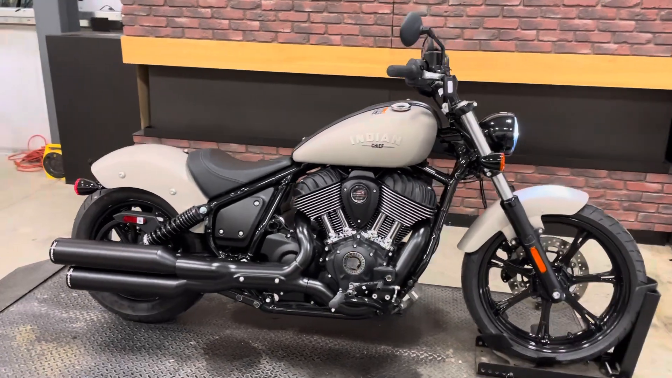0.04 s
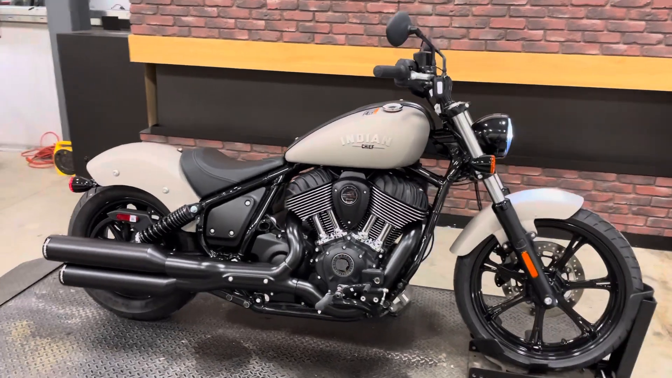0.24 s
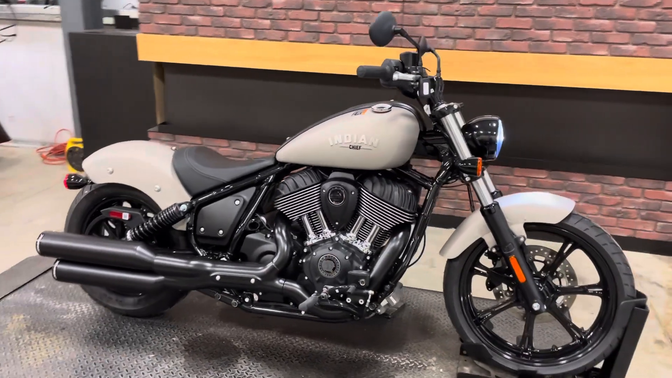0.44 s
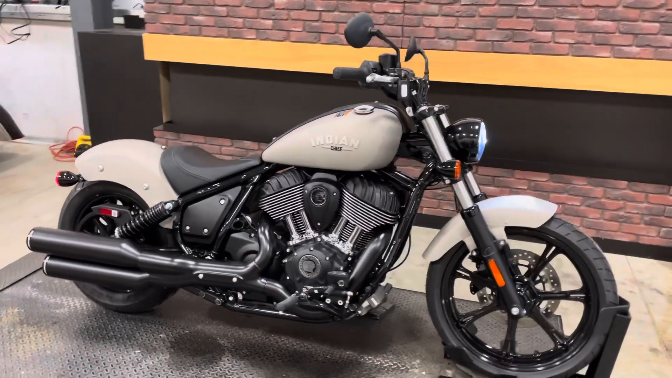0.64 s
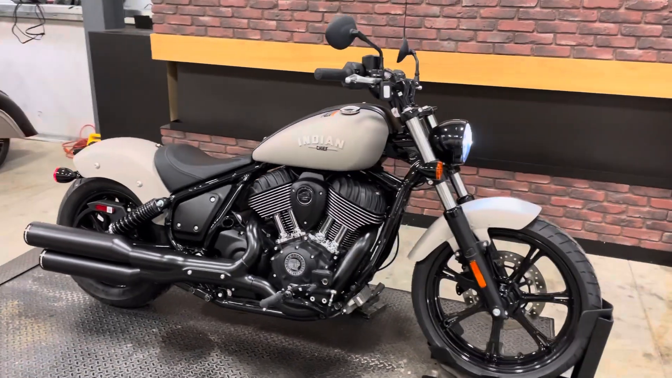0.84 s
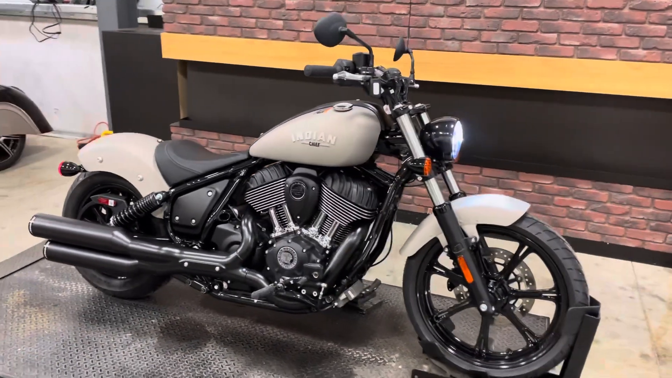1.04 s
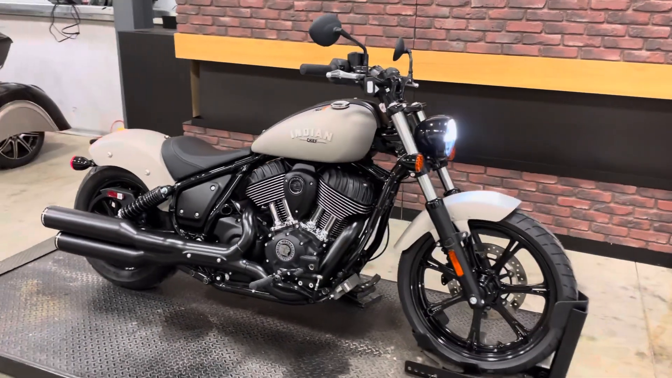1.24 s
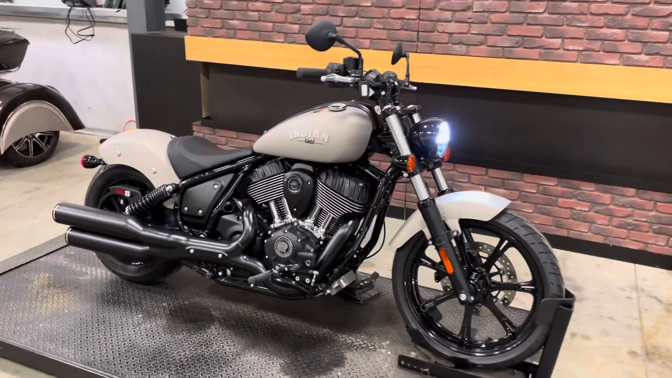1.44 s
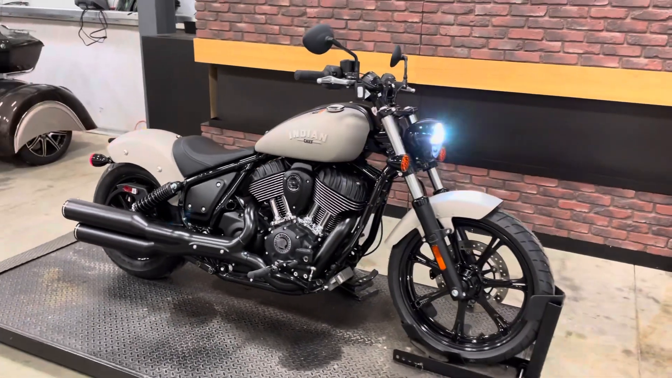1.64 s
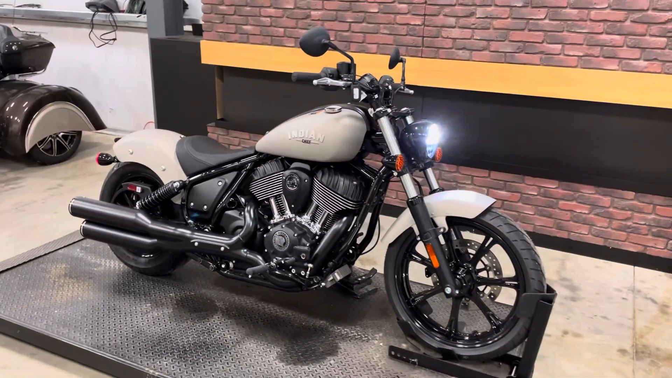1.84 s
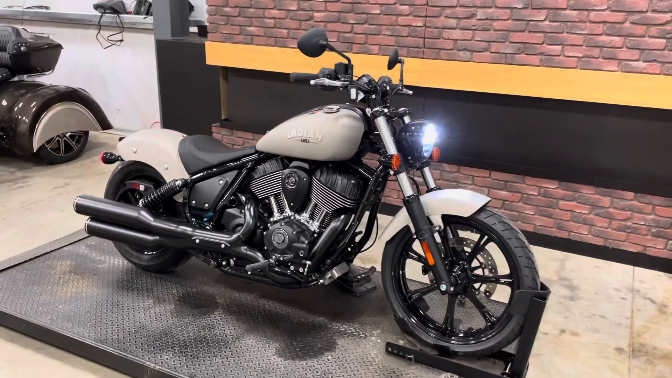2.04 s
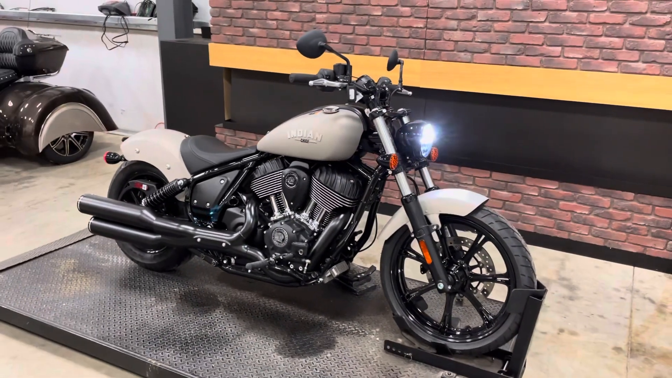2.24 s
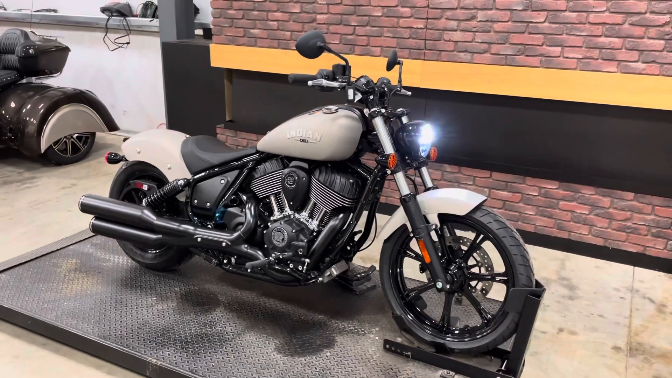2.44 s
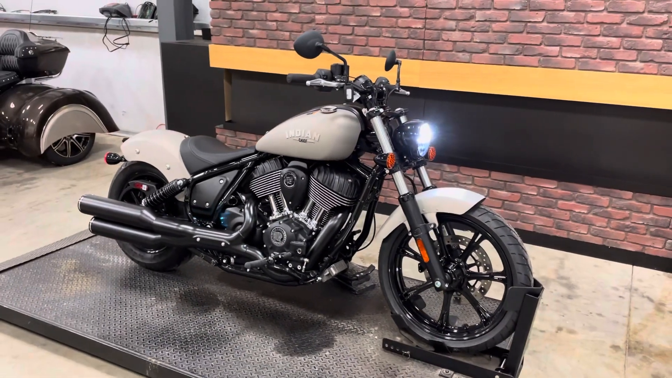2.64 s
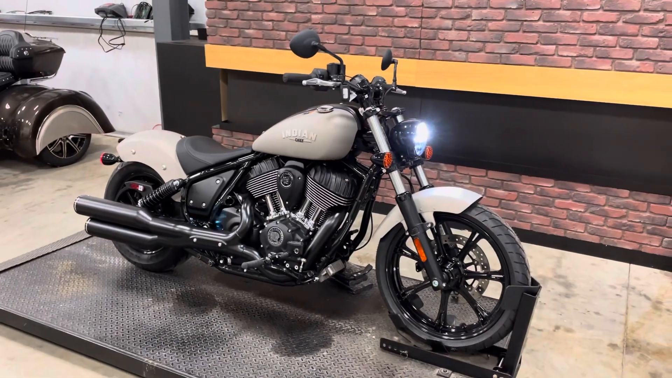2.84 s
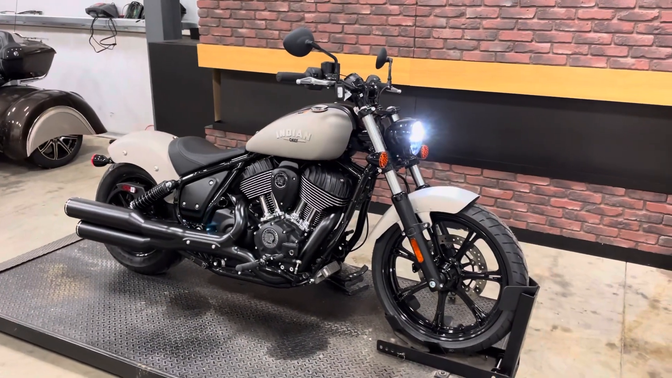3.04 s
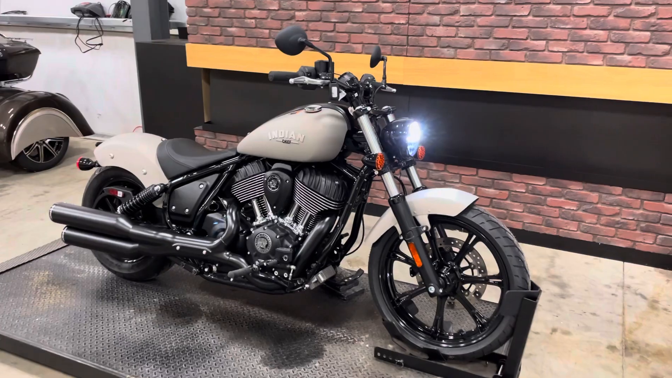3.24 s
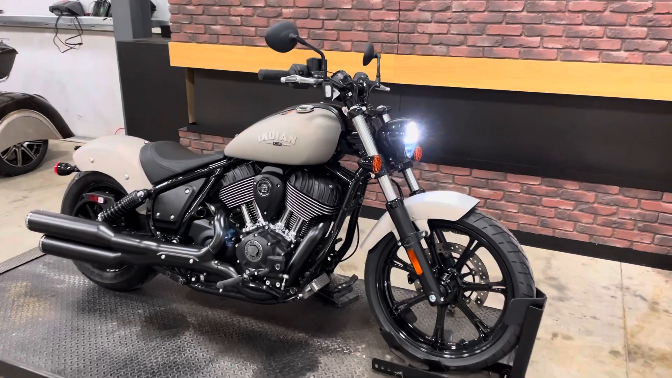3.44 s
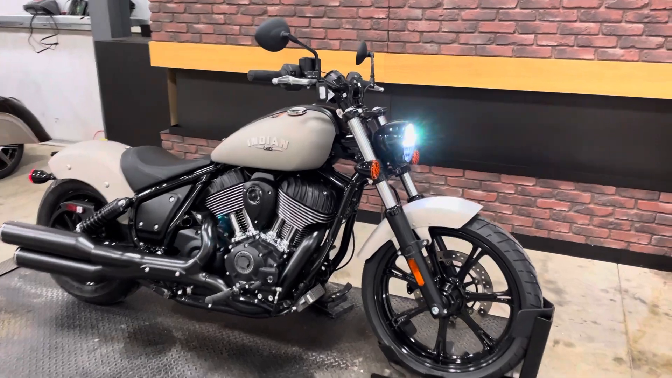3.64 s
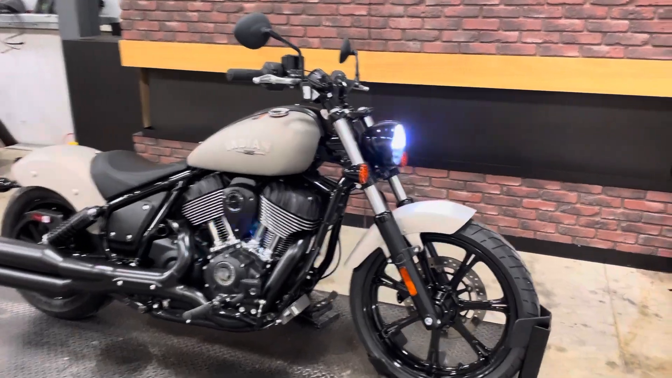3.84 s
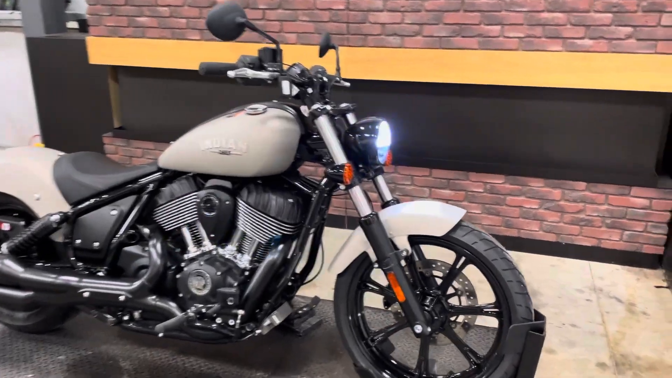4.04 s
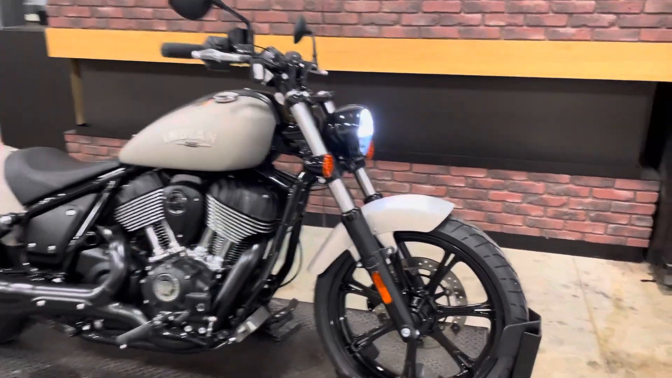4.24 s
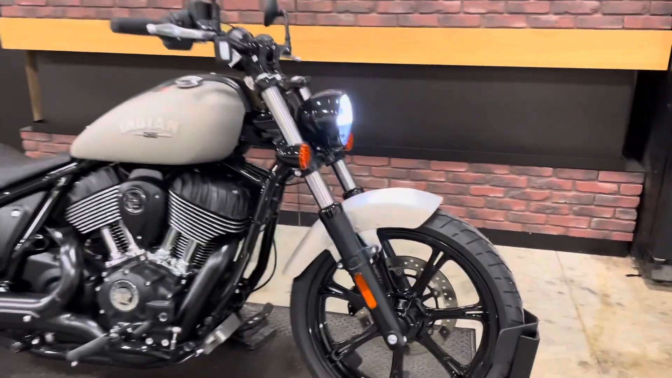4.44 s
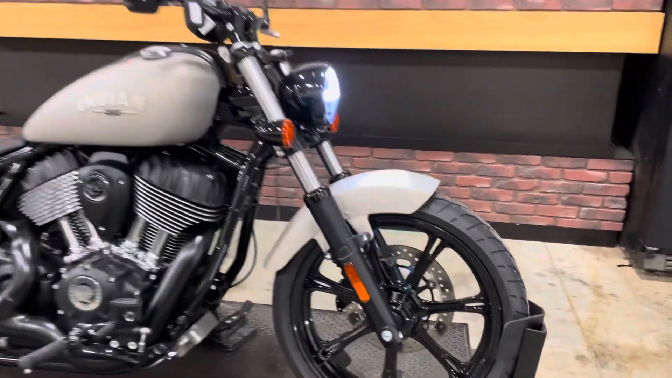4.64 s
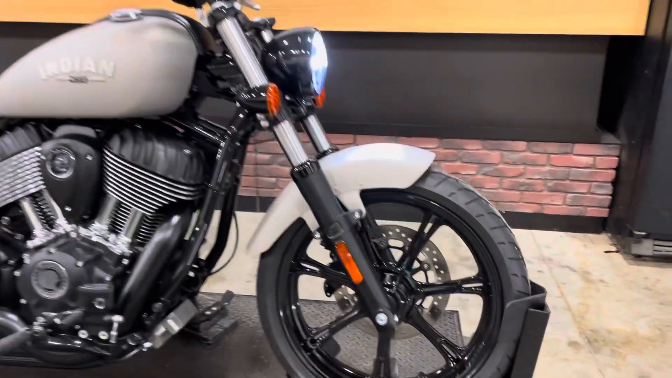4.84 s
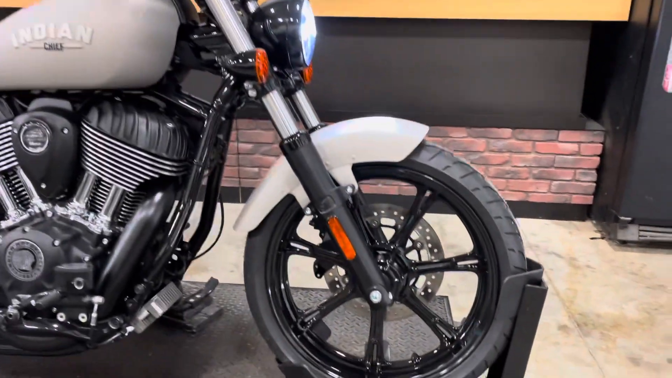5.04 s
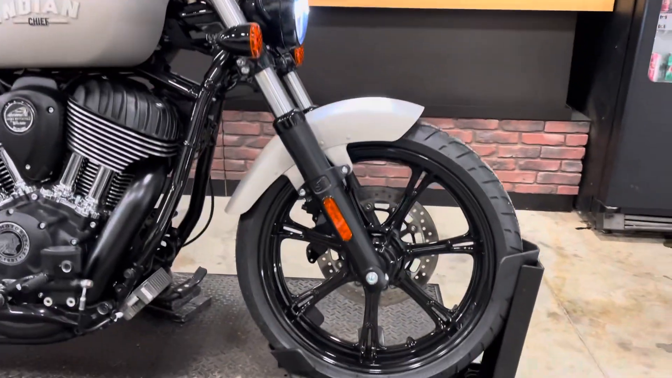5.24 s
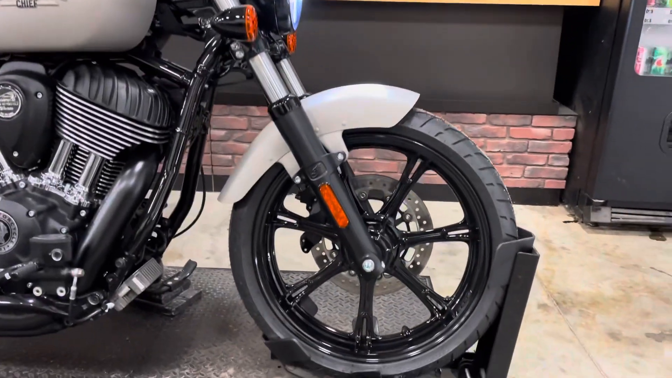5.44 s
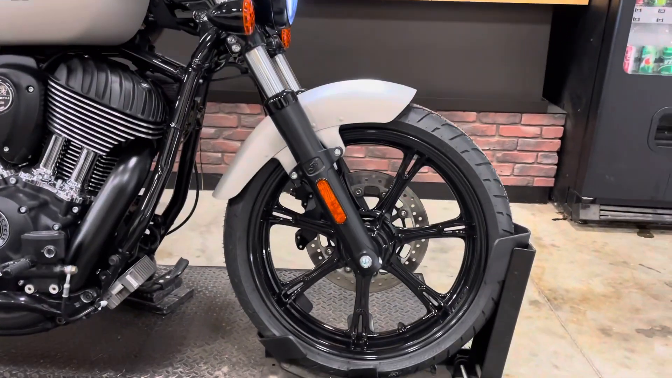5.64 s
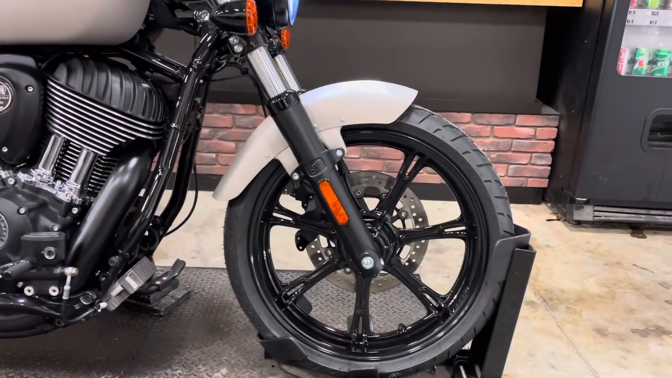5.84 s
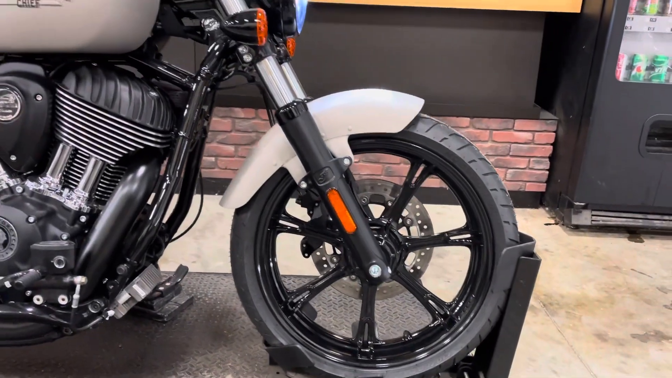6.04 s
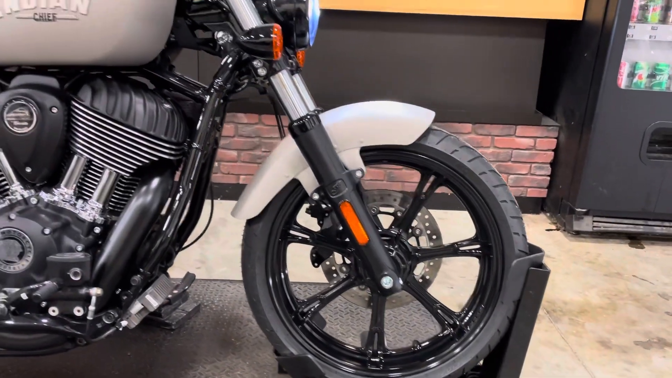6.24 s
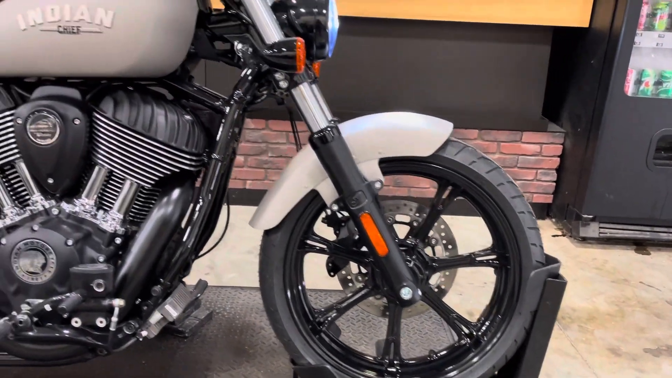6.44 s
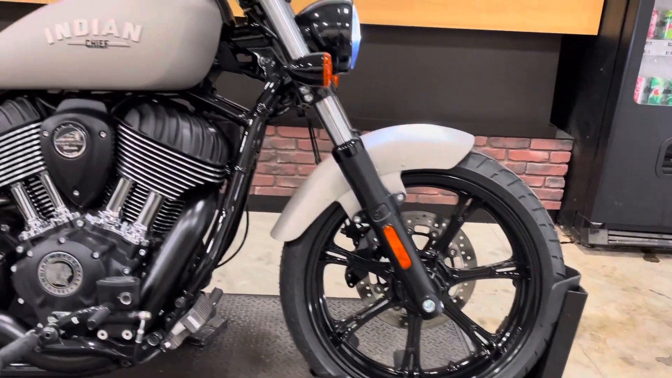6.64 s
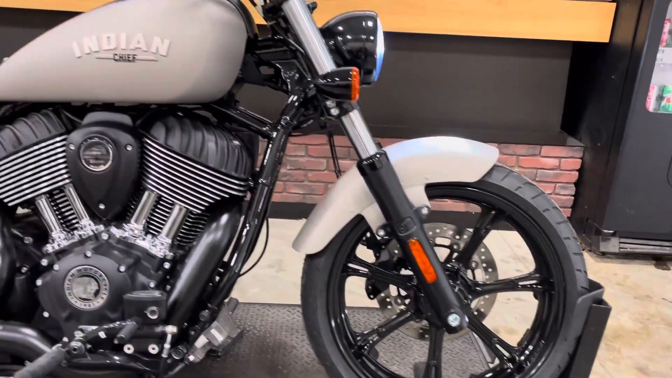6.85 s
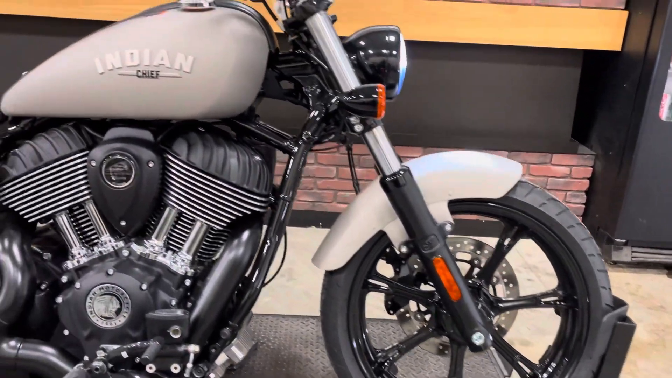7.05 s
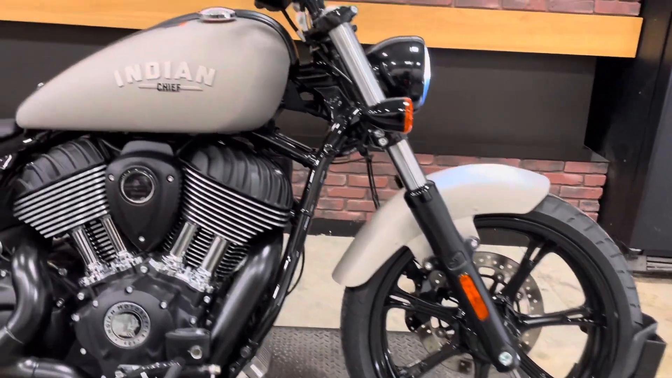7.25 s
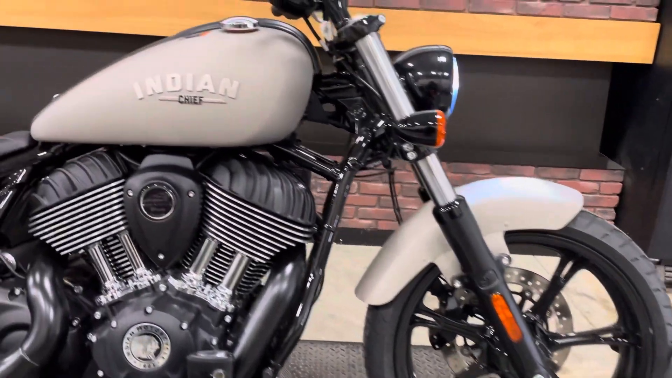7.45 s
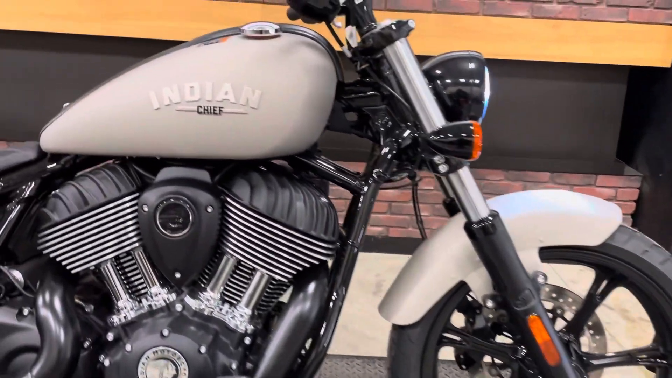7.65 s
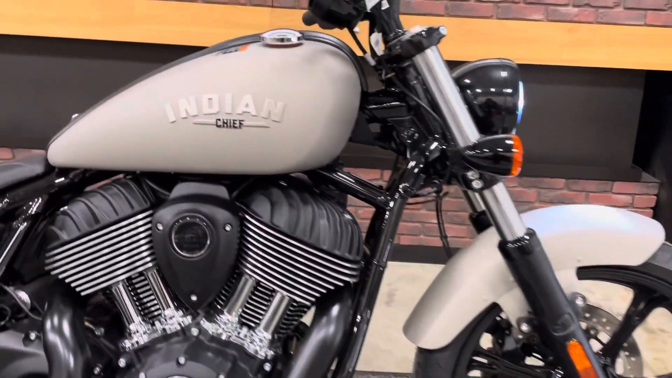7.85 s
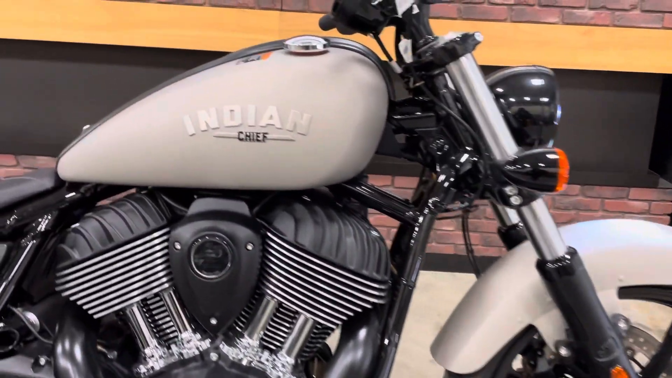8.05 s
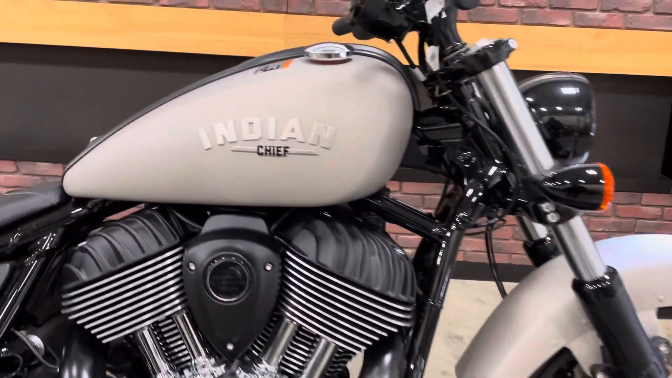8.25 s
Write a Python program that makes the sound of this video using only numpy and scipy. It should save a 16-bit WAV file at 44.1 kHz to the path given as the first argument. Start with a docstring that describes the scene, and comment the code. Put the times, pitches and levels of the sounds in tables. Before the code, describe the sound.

Deep, loping exhaust thumps come from a big two-cylinder motorcycle idling indoors, at first a little way off. The beat wavers slightly but never revs. A stereo microphone moves closer, with the pipes slightly to the left, so the thumping swells and the exhaust growl, metallic valve ticks, knocks, rattling whir and a faint whine come forward. The room adds a brief low echo.

```python
"""Low, uneven thumps come first: a large V-twin motorcycle idling across a showroom. Each firing
thumps in the exhaust, booms on in pipes and walls, and closes a valve with a tick and a knock; the
rear cylinder sometimes burns weakly and pops late. A two-port stereo microphone is walked up to the
engine, pipes to its left, and the growl of gas, the whir of gears and chain and a thin whine grow."""
import sys
import numpy as np
from scipy import signal
from scipy.fft import rfft, irfft, next_fast_len
from scipy.io import wavfile
from scipy.ndimage import uniform_filter1d, minimum_filter1d, map_coordinates

SR = 44100
rng = np.random.default_rng(int(sys.argv[2]) if len(sys.argv) > 2 else 0)


def output_pcm(signal):
    """Save a mono or channel-first signal as 16-bit PCM at the path in sys.argv[1].

    Samples are clipped to [-1, 1] before scaling.
    """
    pcm = np.clip(np.atleast_2d(signal).T, -1, 1) * 32767
    wavfile.write(sys.argv[1], SR, np.round(pcm).astype(np.int16))


N = 366030
SIZE = next_fast_len(N + SR)
HZ = np.fft.rfftfreq(SIZE, 1 / SR)
IDLE_RPM = 816.05


def amp(db):
    return 10 ** (np.asarray(db) / 20)


def unit(x):
    return x / np.sqrt(np.mean(x ** 2) + 1e-20)


def spectrum(points, column=1):
    """One column of a table, spread over log frequency."""
    cols = np.transpose(points)
    return np.interp(np.log(HZ + 1), np.log(cols[0] + 1), cols[column])


def curves(rows):
    """One value per sample for each column after the time."""
    times, *cols = np.transpose(rows)
    return [np.interp(np.arange(N) / SR, times, c) for c in cols]


def filtered(x, response):
    return irfft(rfft(x, SIZE) * response, SIZE)[..., :N]


def resonance(hz, width_hz):
    return 1j * HZ * width_hz / (hz * hz - HZ * HZ + 1j * HZ * width_hz)


def pulses(times, size):
    """An impulse of each size at each time."""
    at = np.round(np.asarray(times) * SR).astype(int)
    return np.bincount(at[at < N], np.broadcast_to(size, at.shape)[at < N], N)


def bursts(times, db, rise, t60):
    """An envelope that swells to each time and dies after it."""
    t = np.arange(SR // 4) / SR
    attack = np.sin(np.pi / 2 * np.clip(t / rise, 0, 1)) ** 2
    decay = amp(-60 * np.maximum(t - rise, 0) / t60)
    return signal.fftconvolve(pulses(np.maximum(times - rise, 0), amp(db)), attack * decay)[:N]


def patchy(x, *layers, window=256):
    """Make x flicker in random patches; a layer is (depth/dB, bins, frames)."""
    z = signal.stft(x, nperseg=window)[2]
    for depth_db, bins, frames in layers:
        field = uniform_filter1d(rng.standard_normal(z.shape[1:]), bins, axis=0)
        z = z * amp(depth_db * unit(uniform_filter1d(field, frames, axis=1)))
    return signal.istft(z, nperseg=window)[1][:, :N]


# The walk up to the engine: t/s, then base level/dB of whir, growl, front thump, tick, knock
WALK = [(0, -39.5, -40, -6, -54.5, -47.5), (1, -37.5, -40, -6.5, -55, -47.5),
        (2, -37, -41, -5, -54.5, -45.5), (3, -33.5, -38, -5.5, -51.5, -44), (4, -31.5, -36, -2, -47, -38.5),
        (5, -28, -31.5, 2, -45, -33), (6, -28, -32.5, -1, -43, -33), (7, -26.5, -29, 1, -40.5, -27),
        (7.7, -25, -27, 0, -40, -27), (8.3, -26, -27.5, 2, -45, -29.5)]
# The idle hunts: t/s, crank's lag behind a steady idle/ms
CRANK_LAG = [(-.06, -10.5), (.09, 1.5), (.23, -3), (.39, 6), (.69, 11.5), (.83, 3.5), (.98, 8.5),
             (1.12, 0.5), (1.41, 2), (1.71, 4.5), (2.0, 1.5), (2.3, 1.5), (2.45, 5), (2.59, 0.2), (2.89, 8),
             (3.04, 16), (3.33, 11.5), (3.63, 14.5), (3.93, 21.5), (4.37, 16.5), (4.51, 10), (4.96, 25.5),
             (5.53, 3.5), (5.68, 6), (5.83, 3), (6.99, -5.5), (7.15, 1), (7.59, 4.5), (7.88, -2)]
# Firings that stand out: t/s, extra level/dB of thump, tick, knock
ODD_FIRINGS = [(.23, 1, 3, -0.5), (.53, 0.5, 1, -1), (.30, -16, -1.5, 1), (.39, 0, -1, -6),
               (.60, -6, -5, -7), (.75, -7, -1, -6), (.83, 1, 5, 1.5), (1.12, 1, 5, 2.5),
               (1.47, 1, -0.5, -17.5), (2.06, -1.5, 2, -7), (2.21, 0, -2.5, 5.5), (2.35, -11, -5, 0),
               (2.95, -7, 4, 4), (3.11, -3.5, -3, 1.5), (3.25, -1.5, 4, 6.5), (3.70, -8, -1.5, -25),
               (4.08, 1.5, -0.5, -8), (4.14, -4.5, -13, -15), (4.28, -8, -4, 3), (4.73, -9, -0.5, -1),
               (4.81, -0.5, 5, 6.5), (4.88, -5.5, -1, -6), (5.03, 0, 3, 5.5), (5.17, -1.5, 1.5, -4),
               (5.45, 0, -0.5, -5.5), (5.74, -0.5, -1, 4), (5.83, 6.5, 4.5, 2.5), (5.89, -4.5, -1, 1),
               (6.11, -2.5, -1, 1.5), (6.18, -3.5, 0, -2.5), (6.26, 4.5, 2, -0.5), (6.41, 0, 1, 0.5),
               (6.47, 0.5, 1.5, 3.5), (6.56, 2.5, 0.5, -4), (6.70, 0.5, 1.5, 1), (6.76, 1, 1, -6),
               (7.0, -2, 2, -3.5), (7.21, 2, 0, 3), (7.65, 1, 0, 0.5), (7.88, -0.5, 1.5, 6.5),
               (7.94, 1.5, 3.5, 2), (8.03, 1, 3.5, 1), (8.17, -1.5, 3, 2), (4.51, 2.5, 3.5, 5.5),
               (4.66, 0, 0.5, 6.5), (3.19, 1.5, -2, 4.5), (3.48, 0.5, -3, 4), (7.06, 0, -1.5, -1.5),
               (7.29, 4.5, 6, 2.5), (7.51, 1, 0.5, 1.5), (7.80, -1, 3.5, 5), (8.24, -1, 5, 1)]
def firings(rear_share=0.418, rear_db=(-2.5, -2, -1.5), scatter_db=(0.6, 1.4, 1.6)):
    """Rear and front cylinders fire in turn at uneven gaps: times, then thump, tick and knock dB."""
    cycle_s = 120 / IDLE_RPM  # two turns of the crank
    steady = 0.0881 + np.arange(-1, N / SR / cycle_s) * cycle_s
    front = steady + np.interp(steady, *np.transpose(CRANK_LAG)) / 1000
    rear = front[:-1] + rear_share * np.diff(front)
    times = np.ravel([rear, front[1:]], order="F")
    times = np.maximum(times[times < N / SR], 0)
    walk = np.transpose(WALK)
    db = np.transpose([np.interp(times, walk[0], c) for c in walk[-3:]])
    db += rng.standard_normal(db.shape) * scatter_db
    db[::2] += rear_db
    for when, *extra_db in ODD_FIRINGS:
        db[np.argmin(abs(times - when))] += extra_db
    return times, *db.T


# Microphone position: t/s, nearness (0 far off, 1 beside the engine)
NEARNESS = [(0, 0.25), (2, 0.57), (4, 0.81), (5, 0.95), (6, 0.94), (7, 1)]
# Booms of the rear pipe, then the front: delay/ms, f/Hz, width/Hz, drive far/dB, drive near/dB
PIPE_BOOMS = ([(6.06, 86, 47, 31.5, 40.5), (11.88, 124.7, 30, 33, 42.5), (20.6, 62, 17.4, 35, 29),
               (17.5, 80.3, 4, -3, 34), (24.65, 184.4, 43.3, 22, 41), (28.55, 74.9, 11.4, 16, 48),
               (29.55, 208, 17, 40, 47.5), (31.6, 89.8, 12, 0, 43.5), (40.1, 81.6, 26, 8.5, 39.5),
               (45.84, 160.6, 43, 20.5, 44.5), (60.26, 117.1, 37.4, 30, 46.5), (79.58, 58, 74, 13, 42.5)],
               [(2.1, 194.7, 49, 18, 36.5), (13.7, 48, 21, 31, 26.5), (15.1, 98, 136, 23, 38),
               (17.43, 159, 90, 31, 27), (22.33, 138, 27, -28, 45.5), (23, 202.1, 17.7, 33.5, 34),
               (25.2, 157.7, 42, -8, 43.5), (29, 99.2, 61, 33.5, 33.5), (41.13, 143.5, 44, 32, 42.5),
               (42.2, 79.4, 38, 21, 44.5), (43.18, 121.6, 86, 17.5, 42.5), (42.2, 155.6, 17.7, 30.5, 29.5),
               (50.6, 176, 17, 12.5, 44), (60.36, 78, 31, 36, 32.5), (85.4, 123.4, 41, 32.5, 42.5),
               (94.1, 194, 20, 35, 33), (94.3, 144.3, 21, 20.5, 40.5)])
def exhaust():
    """The blow-down thump leaves the muffler just after the valve event; booms follow at set delays."""
    times, thump_db = firings()[:2]
    muffler = resonance(125, 121) ** 2 / (1 + 1j * HZ / 77) ** 2
    out = filtered(pulses(times + 0.00553, amp(thump_db + 59)), muffler)
    # what the rear cylinder left unburnt pops further down the pipe
    unburnt = np.maximum(amp(np.roll(thump_db, -1)) - amp(thump_db), 0)[:-1:2]
    out += filtered(pulses(times[:-1:2] + 0.034, unburnt * amp(32)), resonance(167, 130) ** 2)
    for cylinder, pipe in enumerate(PIPE_BOOMS):
        fired = times[cylinder::2]
        near = np.interp(fired, *np.transpose(NEARNESS))
        for ms, hz, width_hz, far_db, near_db in pipe:
            db = far_db + (near_db - far_db) * near + rng.standard_normal(len(fired))
            out += filtered(pulses(fired + ms / 1000, amp(db)), resonance(hz, width_hz) ** 2)
    return filtered(out, 1 / np.sqrt(1 + (HZ / 245) ** 8))  # the packing soaks up the upper bass


def showroom(x, t60, width):
    """The walls return a diffuse low tail, new every third of a second as the microphone moves."""
    out, step, t = np.zeros((2, N + SR)), SR // 3, np.arange(SR // 2) / SR
    for start in range(0, N, step):
        mid, side = rng.standard_normal((2, len(t))) * amp(-60 * t / t60) * (t > 0.02)
        tails = np.array([mid + width * side, mid - width * side]) / np.linalg.norm(mid)
        wet = signal.fftconvolve(x[None, start:start + step], tails, axes=1)
        out[:, start:start + wet.shape[1]] += wet
    return filtered(out[:, :N], resonance(155, 460))


# Upper pipe resonances: f/Hz, width/Hz, relative level far/dB, near/dB
PIPE_MODES = [(279, 25, -3, -3), (314, 23.5, -5.5, 1.5), (401.5, 21.3, -8, -2.5), (486, 46, -8, -5.5),
              (594, 108, -18.5, -7.5), (764, 76, -5, -3.5), (962, 136, -5.5, -9), (1320, 104, -4, -12.5)]
# The strongest one comes and goes along the walk: t/s, relative level/dB
PIPE_HUM = [(0, 0), (.75, -5), (.85, 4), (2.1, 3.5), (2.5, -3), (3.9, 4.5), (4.7, -0.5), (5, 4), (7.7, 0),
            (8.3, -4)]
def growl():
    """Turbulent gas sounds the pipe resonances, each waxing and waning, a little more at each firing."""
    swell = unit(1 + bursts(firings()[0] + 0.0043, -4, rise=0.017, t60=0.15))
    gas = rng.standard_normal((2, N))
    lead = np.exp(1j * np.outer([1, -1], 0.44 * HZ / (HZ + 350)))  # the pipes lie to the left
    gas = filtered(gas + 1.7 * gas.sum(axis=0), resonance(380, 540) * lead)
    far = near = 0
    for k, (hz, width_hz, far_db, near_db) in enumerate(PIPE_MODES):
        mode = (-1) ** k * filtered(gas, resonance(hz, width_hz))
        far += amp(far_db) * mode
        near += amp(near_db) * mode
    hum = amp(curves(PIPE_HUM)[0]) * filtered(gas, resonance(357.2, 19.6))
    pipes = far + curves(NEARNESS)[0] * (near - far) + hum
    pipes = unit(patchy(pipes, (2.5, 2, 8), window=2048))
    return amp(curves(WALK)[1]) * pipes * swell * amp([[0.6], [-0.6]])


# The left port hears more, or sooner: f/Hz, share of mid in side, its lead/rad
PORT_LEAN = [(300, 0.98, 2.3), (700, 0.78, 0.5), (1200, 0.6, -0.15), (1600, .3, 1.5), (2300, 0.41, 1.5),
             (4400, 0.61, -0.7), (6500, .3, -1), (7500, 0.29, -2)]
def port_noise(spectra, side_db):
    """Noise at the microphone's two ports, from a mid and a side spectrum."""
    common, apart = rfft(rng.standard_normal((2, N)), SIZE)
    share = np.clip(spectrum(PORT_LEAN), 0, 1)
    lean = share * np.exp(1j * spectrum(PORT_LEAN, column=2))
    difference = lean * common + np.sqrt(1 - share ** 2) * apart
    mid = irfft(common * amp(spectrum(spectra[0])), SIZE)[:N]
    side = irfft(difference * amp(spectrum(spectra[1]) + side_db), SIZE)[:N]
    return np.array([mid + side, mid - side]) / np.std(mid)


# Cooling fin modes: f/Hz, width/Hz, level/dB
FIN_MODES = [(2330, 160, -3.5), (3133, 41, 1.5), (4360, 160, -12), (5020, 290, -11), (5900, 71, -11.5)]
def fins():
    """The cooling fins add their ring to whatever shakes them."""
    return 1 + sum(amp(db) * resonance(hz, width_hz) for hz, width_hz, db in FIN_MODES)


# Tick colour at the microphone, mid then side: f/Hz, relative level/dB
TICK_SPECTRA = ([(1650, -42), (2800, -2.5), (3140, -4), (3380, -4.5), (4260, -7), (5860, -3), (7270, -10),
                 (7990, -30), (9930, -8), (11600, -6.5), (13100, -11.5), (14600, -34.5), (15800, -42)],
                 [(590, -56), (1000, -1), (1180, -20.5), (1380, 0.5), (2140, -22.5), (3030, -15),
                 (3770, -28.5), (5030, -21.5), (6340, -27.5), (8360, -11), (11500, -35.5), (14400, -24.5),
                 (15800, -18)])
def valve_ticks(times, db, force):
    """A valve lands with a gritty tick: a bright burst, a short snap and a soft tail."""
    snap_db = db - 10 + 2.5 * rng.standard_normal(len(times))
    envelope = bursts(times - 0.004, db - 1 + 1.5 * force, rise=0.005, t60=0.1)
    envelope += bursts(times + 0.00086, snap_db, rise=0.0037, t60=0.017)
    envelope += bursts(times + 0.0032, db - 13, rise=0.019, t60=0.33)
    grit = unit(amp(0.87 * unit(uniform_filter1d(rng.standard_normal(N), size=50))))
    hiss = patchy(port_noise(TICK_SPECTRA, side_db=12), (3, 4, 4))
    return filtered(envelope * grit * hiss * amp(3.5), fins())


def struck_metal(modes, times, db, spread_db, rough):
    """Each blow chatters and rings the modes at new strengths, unequally at the two ports."""
    t, out = np.arange(SR // 10) / SR, np.zeros((2, N + SR))
    hz, level_db, t60 = np.transpose(modes)[..., None]
    attack = 1 - np.exp(-t / 0.0019)
    for when, peak_db in zip(times, db):
        size, detune, lead = rng.standard_normal((3, len(modes), 1)).clip(-1.8, 1.8)
        share_db = spread_db * size
        share_db -= 10 * np.log10(np.mean(amp(2 * share_db)))  # the blow's energy is shared out
        chatter = 1 + rough * uniform_filter1d(rng.standard_normal((len(modes), len(t))), size=60)
        rings = amp(peak_db + level_db + share_db - 60 * t / t60) * attack * chatter
        phase = 2 * np.pi * (hz * (1 + 0.0237 * detune) * t + 3 * lead)
        blow = [np.sum(rings * np.sin(phase + side * 0.53 * lead), axis=0) for side in (1, -1)]
        start = max(round(when * SR), 0)
        out[:, start:start + len(t)] += blow
    return out[:, :N] * amp([[1.1], [-1.1]])


# Modes of the engine casing, a thin cover and the valve gear: f/Hz, relative level/dB, t60/s
CASING_MODES = [(1315, -4.5, 0.037), (1647, 0, 0.043), (1850, 0.5, 0.037), (2033, -4, 0.062),
                (2273, 0, 0.041), (2490, 3.5, 0.034), (3230, -16.5, 0.02), (4780, -19.5, 0.026)]
COVER_MODES = [(2340, 0, .12)]
VALVE_GEAR_MODES = [(4637, -0.5, 0.076), (5080, 2, 0.023), (5770, 0, 0.05)]
def valve_knocks(times, knock_db, tick_db, force):
    """A valve knocks the casing and rings the cover; its gear pings and strikes a weaker blow."""
    knock = struck_metal(CASING_MODES, times - 0.005, knock_db + 2.5, spread_db=4, rough=1.6)
    knock += struck_metal(CASING_MODES, times + 0.017, knock_db - 6, spread_db=4, rough=2.7)
    near = np.interp(times, *np.transpose(NEARNESS))
    cover_db = knock_db + 9.5 - 14.5 * near + 2 * force  # faces away from the close microphone
    cover = struck_metal(COVER_MODES, times - 0.004, cover_db, spread_db=1, rough=2)
    ping = struck_metal(VALVE_GEAR_MODES, times + 0.012, tick_db + 6.5, spread_db=4, rough=1)
    return knock + cover + ping


def valves():
    """Each firing closes a valve, now harder, now softer."""
    times, _, tick_db, knock_db = firings()
    force = rng.standard_normal(len(times))
    return valve_ticks(times, tick_db, force) + valve_knocks(times, knock_db, tick_db, force)


# Whir colour at the microphone, mid then side: f/Hz, relative level/dB
WHIR_SPECTRA = ([(240, -28), (400, -11), (561, -7.5), (751, -6.5), (1480, -12), (1800, -11), (3440, -21.5),
                 (5810, -24), (7310, -29.5), (7770, -48.5), (8400, -65), (9500, -32.5), (12000, -60.5),
                 (13300, -55.5), (15800, -94)], [(88, -56), (150, 19), (297, -5.5), (770, -9),
                 (1160, -12.5), (1380, -10), (3010, -21), (3520, -30), (5100, -25.5), (6310, -32.5),
                 (8460, -26.5), (10300, -43), (11500, -94.5), (13000, -61.5), (15800, -63)])
def whir():
    """Gears and chain rattle in short patches; the colour drifts slowly as the microphone moves."""
    swell = 1 + bursts(firings()[0] + 0.013, -7.5, rise=0.014, t60=0.19)
    rattle = filtered(port_noise(WHIR_SPECTRA, side_db=-1.5), (1 + fins()) / 2) * swell
    return amp(curves(WALK)[0]) * unit(patchy(rattle, (2.1, 3, 6), (1, 2, 90)))


# Whine along the walk: t/s, level/dB at the tooth rate, level/dB an octave up
WHINE_LEVELS = [(0, -52, -58), (2, -47.5, -57.5), (3.3, -41, -55), (4.3, -39.5, -45), (5.3, -38, -40.5),
                (6.3, -41, -52.5), (8.3, -42, -50)]
def whine(teeth=28, waver_hz=14):
    """A thin whine, likely gear teeth, wavers in pitch and flutters in strength."""
    knots = rng.standard_normal((3, int(N / SR * waver_hz) + 4))
    waver, *flutter = [map_coordinates(k, [np.arange(N) / SR * waver_hz]) for k in knots]
    tooth_hz = teeth * IDLE_RPM / 60 * (1 + 0.03 * waver)
    phase = 2 * np.pi * np.cumsum(tooth_hz) / SR
    levels = curves(WHINE_LEVELS)
    tone = sum(amp(db + 2.8 * flutter[k]) * np.sin((k + 1) * phase) for k, db in enumerate(levels))
    return tone * amp([[1.5], [-1.5]])


def scene():
    """The engine heard direct, with the walls answering its exhaust."""
    pipes = exhaust()
    walls = amp(-15) * showroom(pipes, t60=0.45, width=0.4)
    return pipes + walls + growl() + valves() + whir() + whine()


def record(dry, low_hz=16, top_hz=15920, ceiling=0.93):
    """The capsule sheds the deepest bass, a fast limiter ducks the loudest thumps, the top is cut."""
    dry = filtered(dry, HZ ** 2 / (HZ ** 2 + low_hz ** 2))
    needed = np.minimum(1, ceiling / (np.abs(dry).max(axis=0) + 1e-9))
    gain = uniform_filter1d(minimum_filter1d(needed, size=441), size=441)
    return filtered(dry * gain, HZ < top_hz)


dry = scene()
out = record(dry)
output_pcm(out)
```